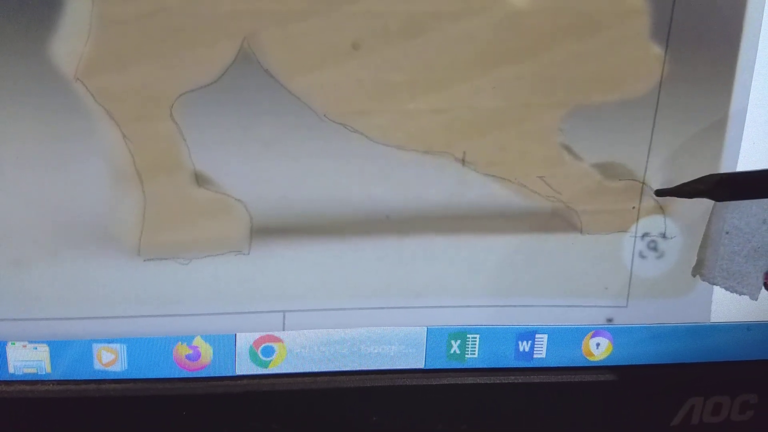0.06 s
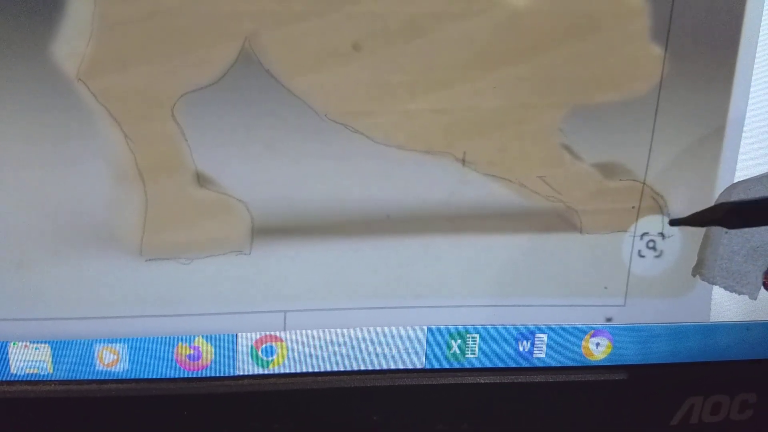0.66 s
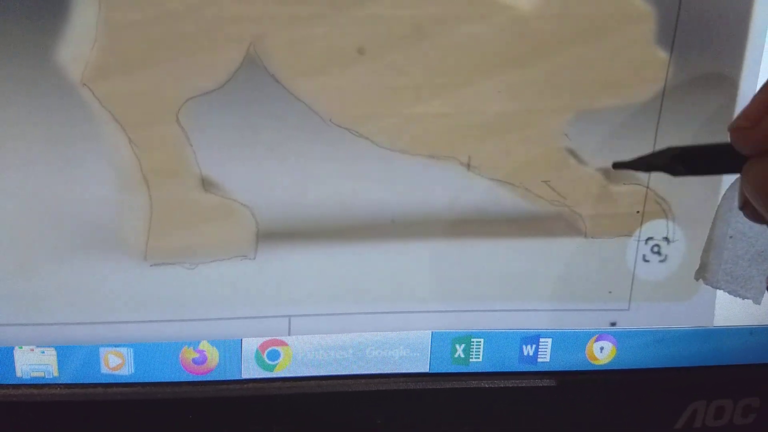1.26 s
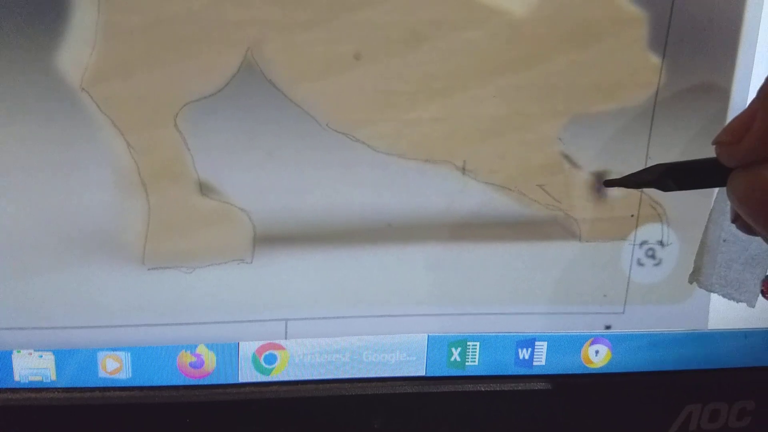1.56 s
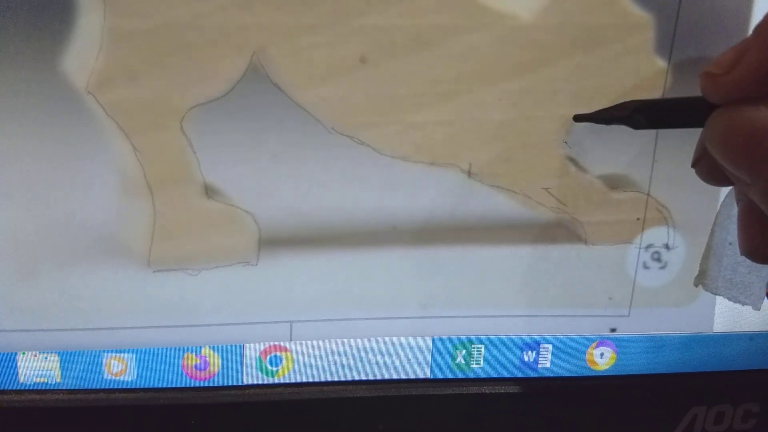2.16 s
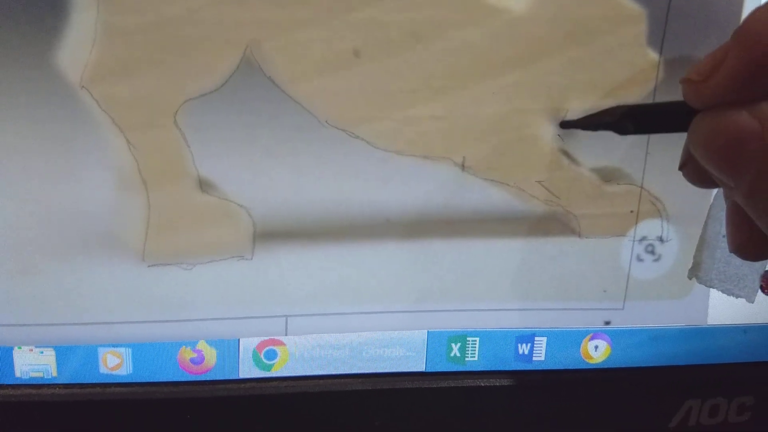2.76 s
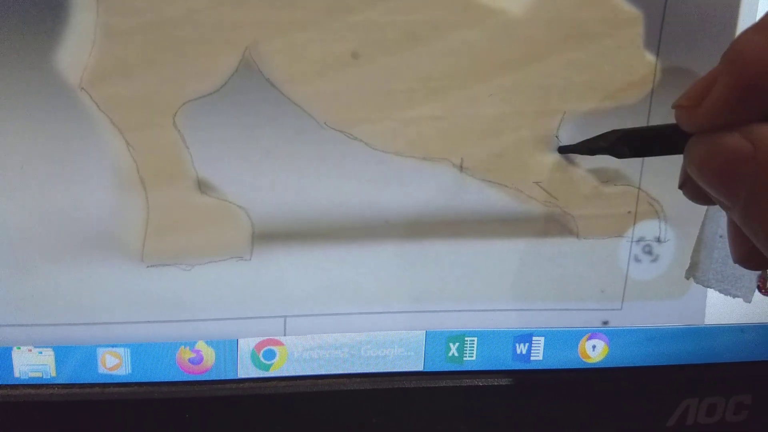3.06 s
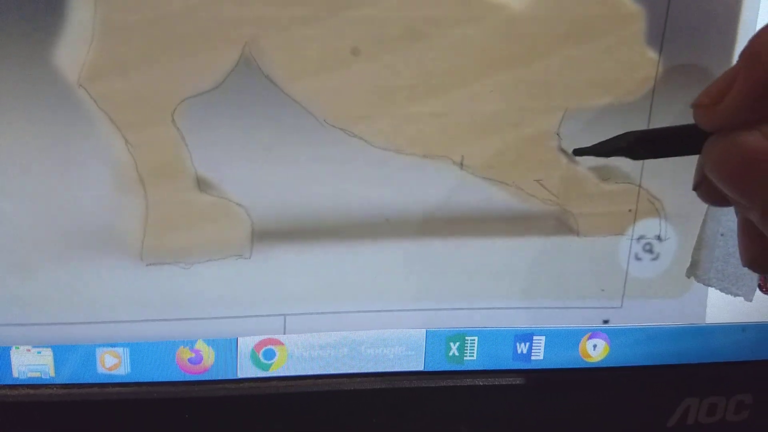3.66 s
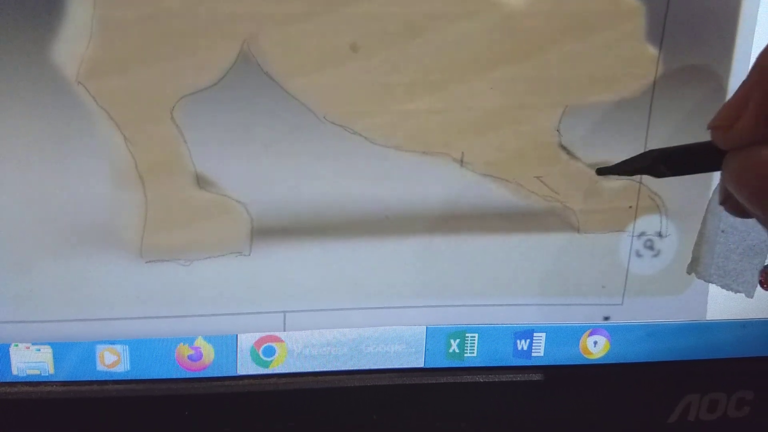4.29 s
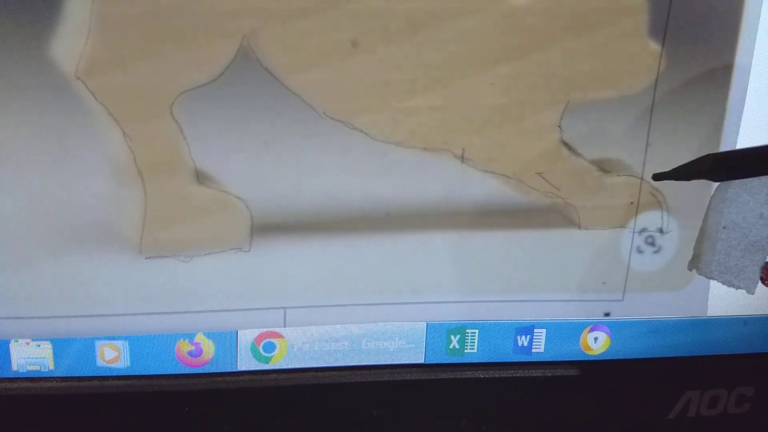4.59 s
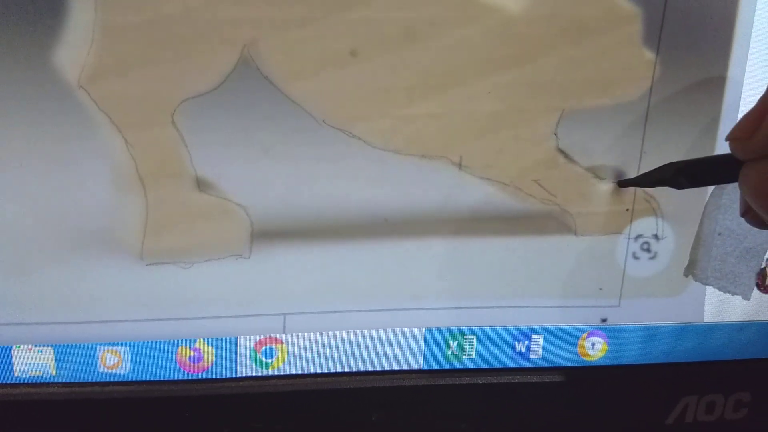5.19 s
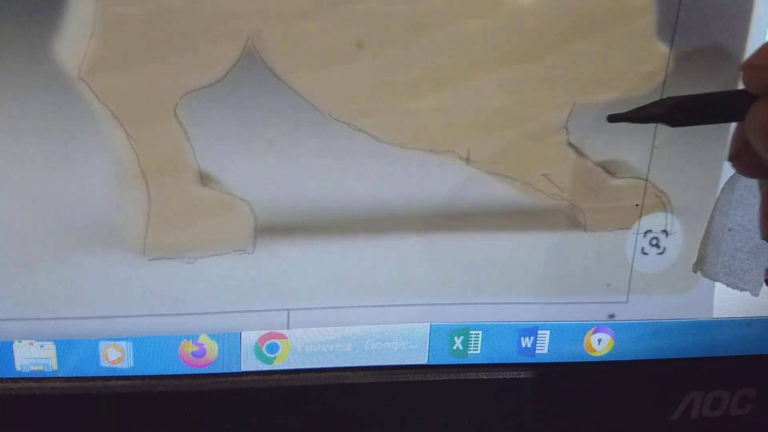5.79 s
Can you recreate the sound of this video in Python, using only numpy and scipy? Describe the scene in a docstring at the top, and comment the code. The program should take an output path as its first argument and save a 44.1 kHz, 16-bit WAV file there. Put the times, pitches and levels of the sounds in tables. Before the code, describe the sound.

Over a computer fan's constant hum, a pencil clicks against a paper-covered screen and traces with faint scratches and squeaks.

```python
"""A small room, close to a computer monitor: a pencil traces round a paper cut-out laid on the screen.
The tip knocks the panel into ringing, ticks on the paper's edge and slides softly along it,
plucking fibres, with faint stick-slip squeaks. The computer's fan rushes and hums throughout;
late on, a far motor drones upward. Two microphone ports pick it up in stereo."""
import sys
import numpy as np
from scipy import signal
from scipy.fft import rfft, irfft
from scipy.io import wavfile

SR = 44100
rng = np.random.default_rng(int(sys.argv[2]) if len(sys.argv) > 2 else 0)


def pcm_store(signal):
    """Save signal as 16-bit PCM."""
    levels = np.round(np.clip(np.atleast_2d(signal), -1, 1) * 32767)
    wavfile.write(sys.argv[1], SR, levels.astype(np.int16).T)


N = 261954
T = np.arange(N) / SR
HZ = np.maximum(np.fft.rfftfreq(N, 1 / SR), 1)
PORT_LAG_S = 0.000365

# pencil contacts: start_s, knock_db, contact_cutoff_hz, tick_db
CONTACTS = [(0.9376, -19, 2200, -33.5), (0.9672, -48, 2500, -40), (1.0506, -62, 1500, -56),
            (1.2881, -65, 2500, -47), (1.7495, -36.5, 890, -60), (1.8786, -22, 830, -52),
            (3.4432, -66, 2500, -56), (4.6245, -43.5, 2800, -36), (4.9555, -47, 1300, -66),
            (5.8375, -20.5, 1277, -38.5), (5.9333, -32, 850, -62)]
# modes of the monitor's panel and case: mode_hz, gain_db, t60_s
PANEL_MODES = [(290.7, -21.5, 0.16), (444, -26, 0.27), (602, -8.5, 0.066), (739, -1.5, 0.045),
               (792, -8.5, 0.058), (853, -3.5, 0.053), (1034, -1.5, 0.023), (1210, 1.5, 0.039),
               (1400, -2.5, 0.017), (1535, -11, 0.067), (1642, -5, 0.035), (1770, -9, 0.024),
               (2070, -16, 0.032), (2510, -18.5, 0.029), (2820, -9.5, 0.022), (3100, -15.5, 0.026),
               (3588, -5.5, 0.019), (3870, -13, 0.024)]
# fan sound at the two ports: freq_hz, left_lead_rad
FAN_PHASE = [(60, -2), (125, -2.3), (190, .2), (1250, 0), (1650, .7), (1900, 2.5), (2330, 3.1), (3550, 6.3),
             (4700, 9.4), (5900, 12.6), (6950, 15.7), (9400, 22), (12000, 15.7), (15800, 6.3)]


def from_db(db):
    """Decibels to gain."""
    return 10 ** (np.asarray(db) / 20)


def unit_rms(x):
    """Scale to rms 1."""
    return x / np.sqrt(np.mean(x ** 2) + 1e-20)


def at_hz(curve, hz=HZ):
    """Interpolate a table over log frequency."""
    freq_hz, value = np.transpose(curve)
    return np.interp(np.log(hz), np.log(freq_hz), value)


def drift(rate_hz):
    """Random wander, rms 1."""
    knots = rng.standard_normal(int(rate_hz * N / SR) + 3)
    return unit_rms(np.interp(T * rate_hz, np.arange(len(knots)), knots))


def low_pass(x, hz):
    """Second-order low-pass."""
    return signal.sosfilt(signal.butter(2, min(hz, .45 * SR), fs=SR, output="sos"), x + 1e-18)


def colour(x, spectrum):
    """Minimum-phase filter, unit power gain."""
    cepstrum = irfft(np.log(unit_rms(from_db(at_hz(spectrum)))), N)
    causal = np.r_[1, np.full(N // 2 - 1, 2), np.zeros(N - N // 2)]
    return irfft(rfft(x) * np.exp(rfft(cepstrum * causal)), N)


def ring(force, hz, t60_s):
    """One mode: a unit impulse starts a decaying sine of height 1."""
    radius = np.exp(-np.log(1000) / (t60_s * SR))
    step_rad = 2 * np.pi * hz / SR
    return signal.lfilter([0, np.sin(step_rad)], [1, -2 * radius * np.cos(step_rad), radius ** 2],
                          force + 1e-18)


def delayed(x, delay_s):
    """Fractional delay."""
    return np.interp(T - delay_s, T, x, left=0)


def correlate(pair, coherence):
    """Mix two independent signals into a partly alike left and right."""
    mid = np.sqrt((1 + coherence) / 2) * pair[0]
    side = np.sqrt((1 - coherence) / 2) * pair[1]
    return mid + side, mid - side


def at_ports(pair, coherence):
    """Partly alike stereo; the right port hears it later."""
    left, right = correlate(pair, coherence)
    return np.array([left, delayed(right, PORT_LAG_S)])


def fan_rush(flutter_db):
    """Turbulent air, shaped by case and desk resonances, arriving differently at each port."""
    # air noise: freq_hz, density_db
    air = [(25, -122), (38, -93), (50, -79.5), (80, -77), (140, -80.5), (330, -77), (500, -81), (800, -87),
           (1300, -83.5), (2100, -88), (4000, -95.5), (6700, -100), (8000, -104), (16000, -112)]
    # case and desk resonances: centre_hz, width_hz, gain_db
    resonances = [(216.2, 6.2, 8.5), (263.4, 23.5, 10), (317.4, 23.5, 8), (595.4, 46.4, 11), (890, 34, 7),
                  (1030, 150, 3.5), (1306, 38, 5.5), (1436, 83, 6.5), (3090, 160, 2.5), (5480, 45, 0.5),
                  (7330, 320, -3.5)]
    # left-right likeness: freq_hz, coherence
    likeness = [(60, 0.49), (140, 0.3), (215, 0.6), (270, 0.91), (370, 0.16), (700, 0.69), (1200, 1),
                (1650, 0.59), (2200, 0.93), (4700, 1), (6900, 1), (9000, 1), (16000, 1)]
    # port balance: freq_hz, left_over_right_db
    balance = [(60, 3), (165, 4.5), (205, -7.5), (260, 0.3), (370, 1.5), (700, 0)]
    case_db = sum(db / (1 + (2 * (HZ - hz) / width_hz) ** 2) for hz, width_hz, db in resonances)
    spectra = rfft(rng.standard_normal((2, N))) * from_db(at_hz(air) + case_db) * np.sqrt(SR / 2)
    left, right = correlate(spectra, at_hz(likeness))
    lean = from_db(at_hz(balance) / 2)
    right_lag = np.exp(-1j * at_hz(FAN_PHASE))
    rush = irfft(np.array([left * lean, right / lean * right_lag]), N)
    return rush * from_db(flutter_db * drift(12))


def hum(shaft_hz, pitch_wobble, waver_db):
    """Blade and mains tones, wavering slightly in pitch and level."""
    # seven-bladed fan: shaft_multiple, level_db
    fan_orders = [(7, -52.5), (8, -64.5), (9, -65.5), (14, -68), (36, -64.5), (42, -76)]
    # mains hum and other steady tones: pitch_hz, level_db
    steady_tones = [(120, -58.5), (168, -71), (253, -58.5), (273, -58), (306, -63.5), (312, -62.5),
                    (1076, -67.5), (1262, -65), (1403, -66)]
    clock_s = T + pitch_wobble * np.cumsum(drift(3)) / SR
    out = np.zeros((2, N))
    for hz, db in [(order * shaft_hz, db) for order, db in fan_orders] + steady_tones:
        phase = 2 * np.pi * (hz * clock_s + rng.random())
        amplitude = np.sqrt(2) * from_db(db + waver_db * drift(3.8))
        out += amplitude * np.sin([phase, phase - at_hz(FAN_PHASE, hz)])
    return out


def computer():
    """Rush and hum swell and sink together."""
    # slow swell: time_s, gain_db
    swell = [(0, -1.5), (.75, -2), (1.3, 0.9), (2.1, 1.5), (3.1, -2.5), (4.35, -1), (4.9, 0.8), (5.4, -2),
             (5.75, -0.1)]
    gain = from_db(np.interp(T, *np.transpose(swell)))
    return gain * (fan_rush(flutter_db=1.0) + hum(shaft_hz=52.48, pitch_wobble=0.001227, waver_db=0.8))


def far_motor(start_s, peak_s, peak_db, waver_db, rumble_db):
    """A far motor's low note rises, swells and fades; a faint low rumble swells with it."""
    start_hz, rise_hz_per_s = 76.7, 6.8
    attack_s, swell_db_per_s, fade_db_per_s = .15, 7, 20
    age_s, past_peak_s = np.maximum(T - start_s, 0), T - peak_s
    pitch_hz = start_hz + rise_hz_per_s * age_s
    level_db = peak_db + np.minimum(swell_db_per_s * past_peak_s, -fade_db_per_s * past_peak_s)
    note = np.sqrt(2) * from_db(waver_db * drift(9)) * np.sin(2 * np.pi * np.cumsum(pitch_hz) / SR)
    band = signal.butter(2, [45, 72], "band", fs=SR, output="sos")
    rumble = unit_rms(signal.sosfilt(band, rng.standard_normal((2, N))))
    return np.minimum(age_s / attack_s, 1) * from_db(level_db) * (note + from_db(rumble_db) * rumble)


def room_tail(x, t60_s, wall_cutoff_hz):
    """Diffuse tail, different at each port, dulled by the walls."""
    age_s = T[:SR // 2]
    decay = np.exp(-np.log(1000) * age_s / t60_s) * (age_s > .003)
    tail = low_pass(rng.standard_normal((2, len(age_s))) * decay, wall_cutoff_hz)
    return signal.fftconvolve(x, unit_rms(tail) / np.sqrt(len(age_s)), axes=1)[:, :N]


def with_desk_echo(x, delay_s, echo_db):
    """Direct sound plus one early reflection off the desk."""
    return x + from_db(echo_db) * np.array([delayed(channel, delay_s) for channel in x])


def dry_click():
    """A dry click in the fingers: a short pitched snap that dies within a few cycles."""
    # dry click: start_s, level_db, pitch_hz, t60_s
    clicks = [(4.393, -31, 1660, 0.0059)]
    return sum(from_db(db) * ring(signal.unit_impulse(N, round(start_s * SR)), hz, t60_s)
               for start_s, db, hz, t60_s in clicks)


def squeaks():
    """Stick-slip locks briefly onto one resonance: a thin note if narrow, a rasp if wide."""
    # squeaks of the point, and one brief drag of the paper on the screen (5.65 s): start_s, length_s, pitch_hz,
    # width_hz, level_db
    slips = [(1.13, .06, 14800, 1200, -70), (1.74, 0.3, 12750, 130, -74), (2.01, .06, 5600, 300, -65),
             (2.16, .10, 5750, 400, -64), (2.207, 0.12, 10350, 220, -67.5), (2.68, .07, 7350, 250, -73),
             (3.16, .11, 7450, 350, -70), (3.20, .07, 13400, 600, -70), (3.90, 0.41, 8100, 700, -72),
             (3.90, .32, 13550, 600, -76), (5.65, 0.051, 1352, 400, -43), (5.69, .05, 5700, 800, -61)]
    out = np.zeros((2, N))
    for start_s, length_s, hz, width_hz, db in slips:
        progress = np.clip((T - start_s) / length_s, 0, 1)
        arch = np.sqrt(np.abs(np.sin(np.pi * progress)))
        flicker = unit_rms(low_pass(rng.standard_normal((2, N)), width_hz / 2))
        out += np.sqrt(2) * from_db(db) * arch * flicker * np.sin(2 * np.pi * hz * T)
    return at_ports(out, coherence=0.25)


def stroke_pressure(start_s, length_s):
    """One stroke presses in and eases off in a rounded arch."""
    progress = np.clip((T - start_s) / length_s, 0, 1)
    return (4 * progress * (1 - progress)) ** 1.3  # higher power: softer ends


def sliding(grain_db, catch_db, panel_db):
    """Graphite plucks uneven paper fibres, catching and freeing; the panel answers faintly."""
    # pencil strokes: start_s, length_s, peak_db
    strokes = [(1.10, .11, -52), (1.187, .22, -58.5), (1.648, .16, -53.5), (3.195, 0.087, -56.5),
               (3.88, 0.22, -61), (4.128, 0.088, -55), (4.42, .25, -58), (5.65, .12, -53.5),
               (5.767, .08, -55)]
    # graphite on paper: freq_hz, relative_db
    rub_spectrum = [(800, -1), (2000, -1), (3500, -4.5), (5800, 2), (8000, -2.5), (10500, -10), (13500, -9),
                    (16000, 0.5)]
    friction = sum(from_db(db) * stroke_pressure(start_s, length_s) for start_s, length_s, db in strokes)
    fibres = rng.standard_normal((2, N)) * from_db(grain_db * drift(1500))
    paper = at_ports(unit_rms(colour(fibres, rub_spectrum)), coherence=.6)
    panel = unit_rms(sum(from_db(db) * ring(fibres[0], hz, t60_s) for hz, db, t60_s in PANEL_MODES))
    return friction * from_db(catch_db * drift(50)) * (paper + from_db(panel_db) * panel)


def ticks(crack_s, rattle_s, rattle_db):
    """The hard point snaps against the paper: a sharp crack and a short rattle of the pencil."""
    # tick of the tip: freq_hz, relative_db
    tick_spectrum = [(600, -8), (1500, -19), (3000, 11.5), (4200, -7), (5600, 12), (6600, 1.5), (7500, 4),
                     (11000, -6.5), (16000, -9.5)]
    envelope = np.zeros(N)
    for start_s, _, _, db in CONTACTS:
        onset = round(start_s * SR)
        age_s = T[:N - onset]
        decay = np.exp(-age_s / crack_s) + from_db(rattle_db) * np.exp(-age_s / rattle_s)
        envelope[onset:] += from_db(db) * decay
    return at_ports(colour(envelope * rng.standard_normal((2, N)), tick_spectrum), coherence=0.41)


def knocks(spot_spread_db, port_spread_db):
    """The tip strikes the panel: softer contact is duller, and each spot weights the modes anew."""
    out = np.zeros((2, N))
    for start_s, knock_db, cutoff_hz, _ in CONTACTS:
        onset = round(start_s * SR)
        force = from_db(knock_db) * low_pass(signal.unit_impulse(min(SR // 4, N - onset)), cutoff_hz)
        for k, (hz, mode_db, t60_s) in enumerate(PANEL_MODES):
            gain_db = mode_db + spot_spread_db * rng.normal() + port_spread_db * rng.normal(size=(2, 1))
            polarity = (-1) ** (k // 3)
            out[:, onset:onset + len(force)] += polarity * from_db(gain_db) * ring(force, hz, t60_s)
    return out


def scene():
    """Pencil on the panel, over the computer and the far motor."""
    background = computer()
    taps = knocks(spot_spread_db=1.0, port_spread_db=1.0)
    taps += ticks(crack_s=0.0013, rattle_s=0.0047, rattle_db=-6)
    tracing = sliding(grain_db=2.5, catch_db=3.0, panel_db=-6) + squeaks() + dry_click()
    pencil = with_desk_echo(taps, delay_s=.00382, echo_db=-6.5) + tracing
    reverb = from_db(-18) * room_tail(pencil, t60_s=0.17, wall_cutoff_hz=3540)
    background += far_motor(start_s=4.15, peak_s=5.64, peak_db=-58.5, waver_db=-2.0, rumble_db=-6)
    return background + pencil + reverb


def record(dry):
    """Each microphone adds faint hiss; a steep low-pass cuts the top."""
    cutoff_hz = 15700
    hiss = from_db([[-74], [-64]]) * rng.standard_normal((2, N))
    return signal.sosfilt(signal.ellip(12, .1, 80, cutoff_hz, fs=SR, output="sos"), dry + hiss)


dry = scene()
out = record(dry)
pcm_store(out)
```